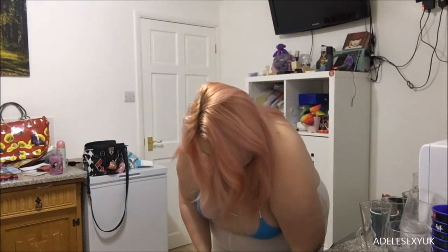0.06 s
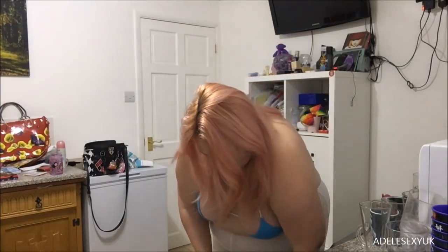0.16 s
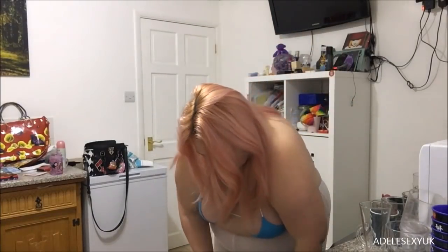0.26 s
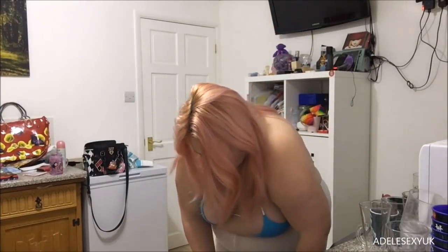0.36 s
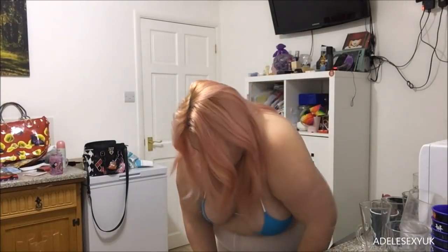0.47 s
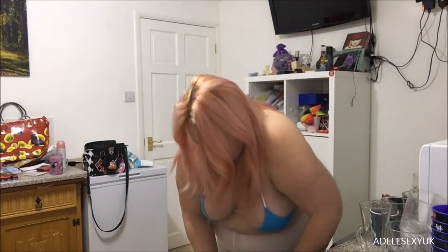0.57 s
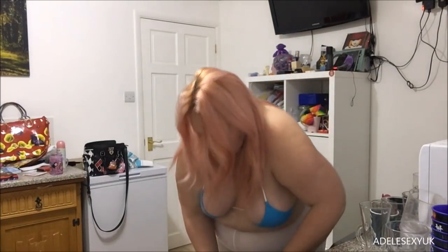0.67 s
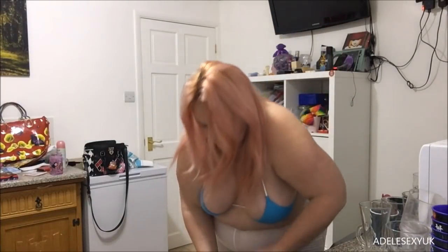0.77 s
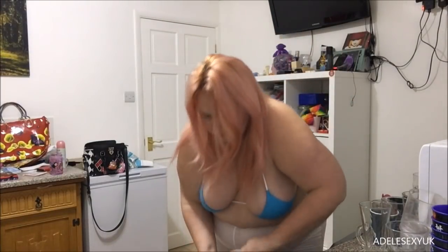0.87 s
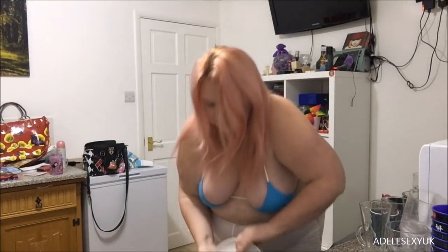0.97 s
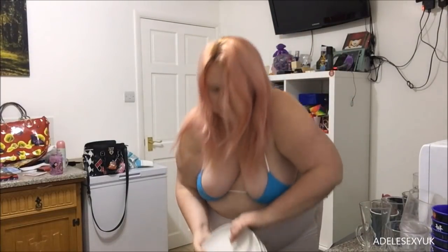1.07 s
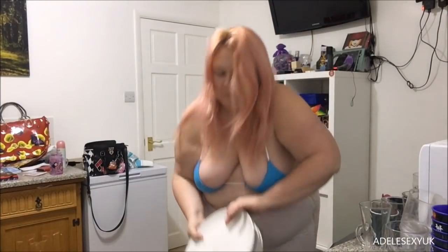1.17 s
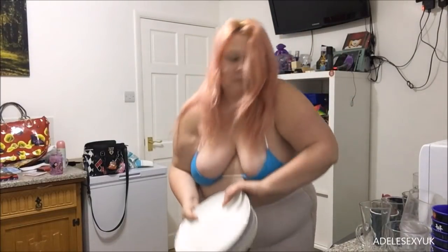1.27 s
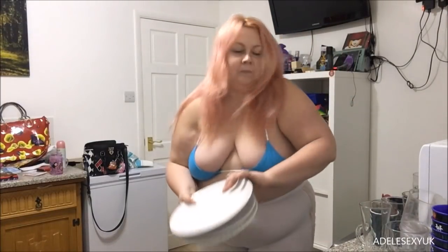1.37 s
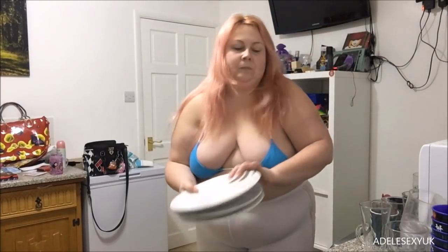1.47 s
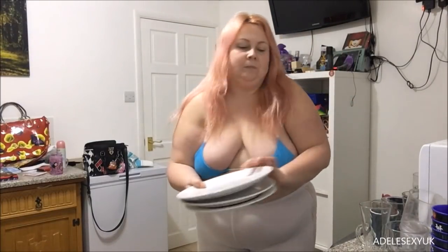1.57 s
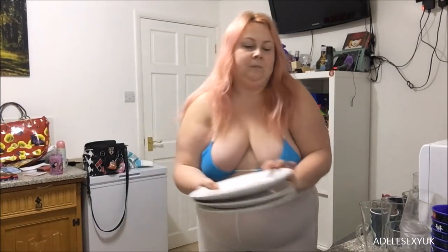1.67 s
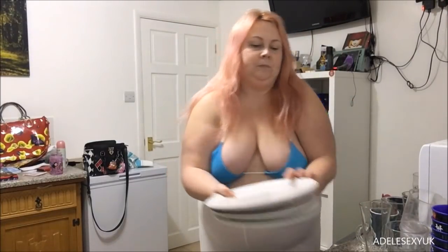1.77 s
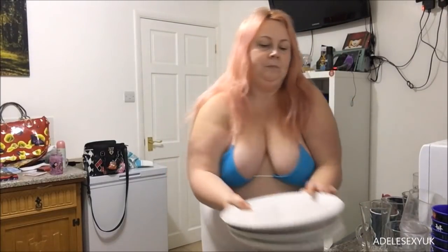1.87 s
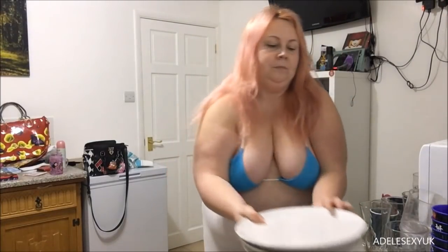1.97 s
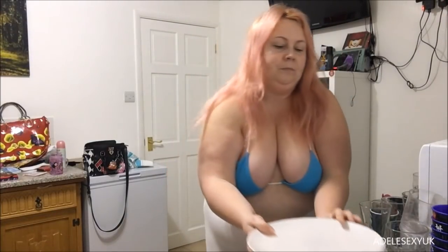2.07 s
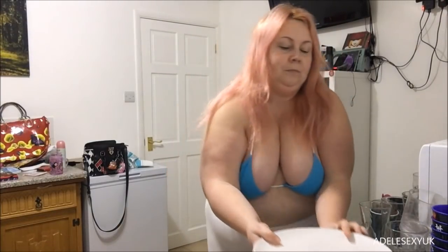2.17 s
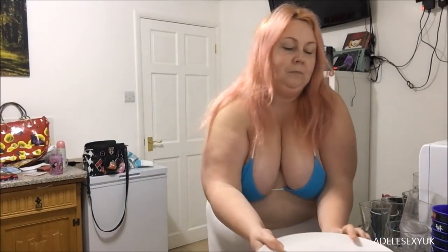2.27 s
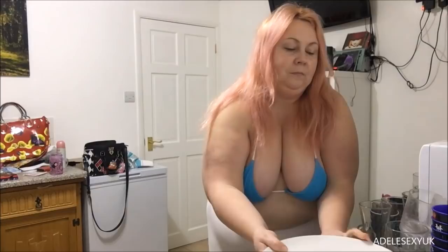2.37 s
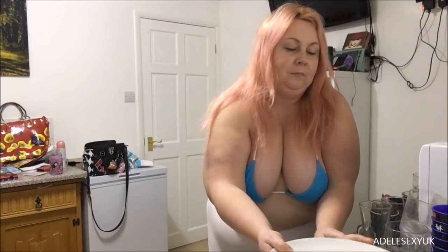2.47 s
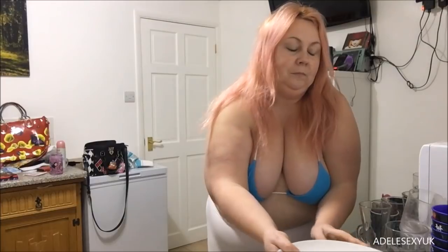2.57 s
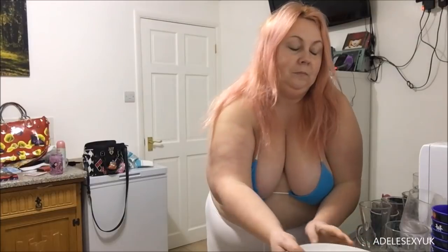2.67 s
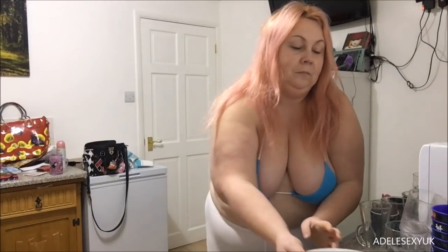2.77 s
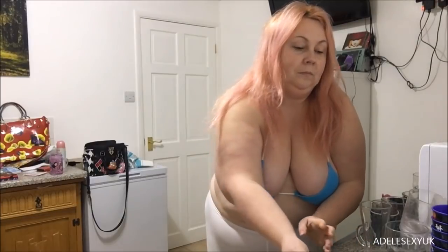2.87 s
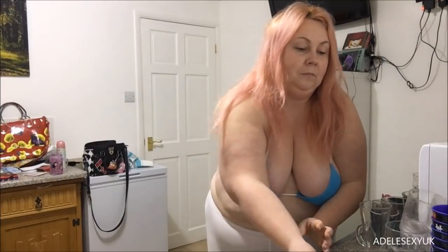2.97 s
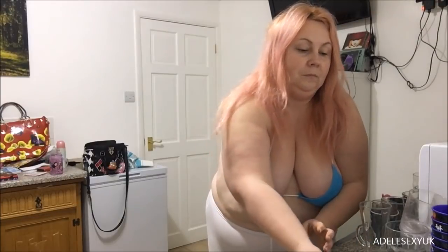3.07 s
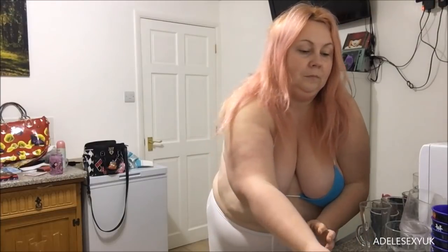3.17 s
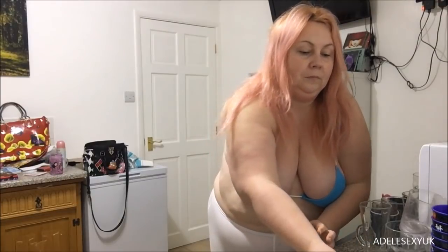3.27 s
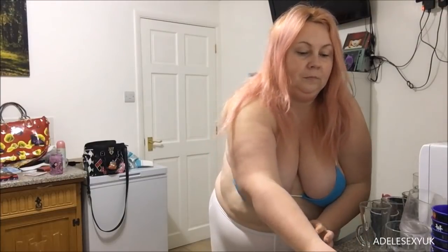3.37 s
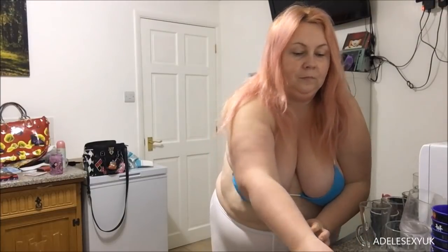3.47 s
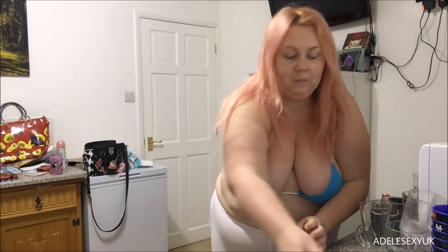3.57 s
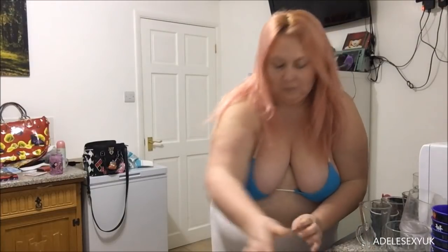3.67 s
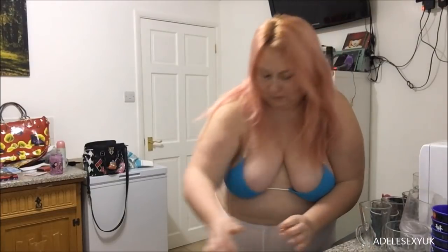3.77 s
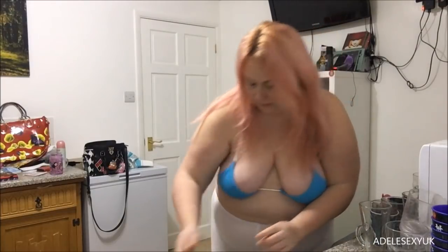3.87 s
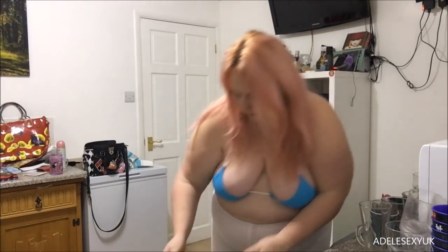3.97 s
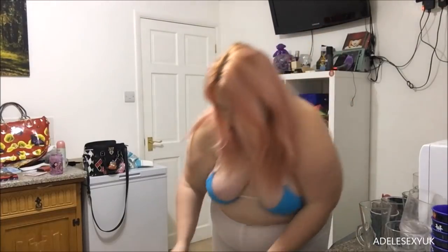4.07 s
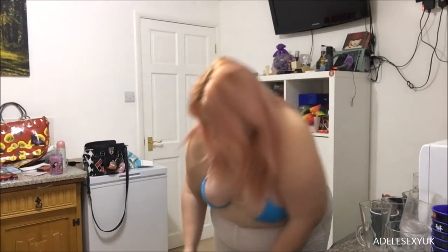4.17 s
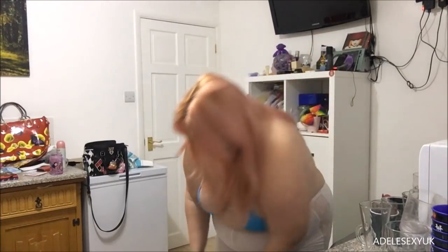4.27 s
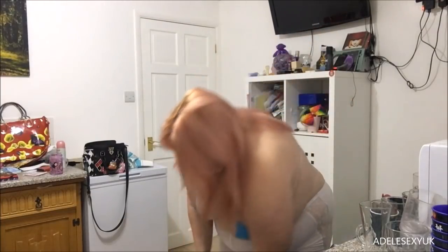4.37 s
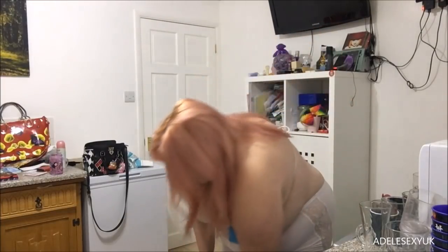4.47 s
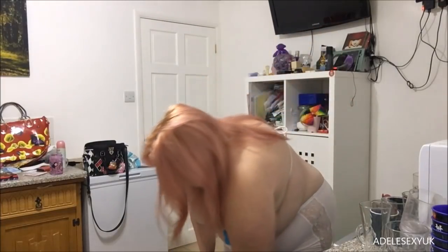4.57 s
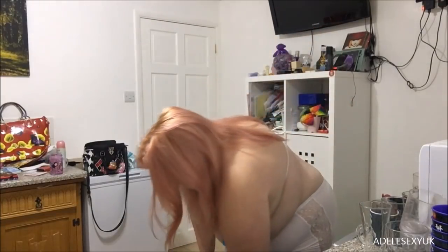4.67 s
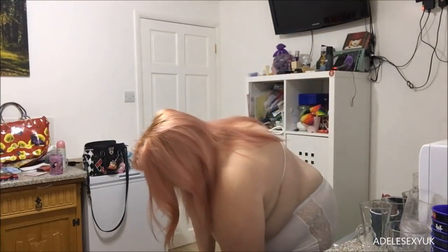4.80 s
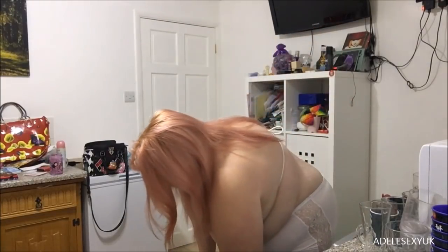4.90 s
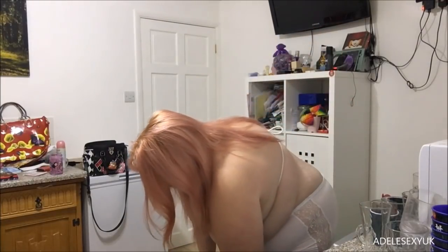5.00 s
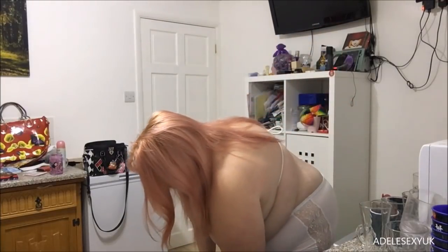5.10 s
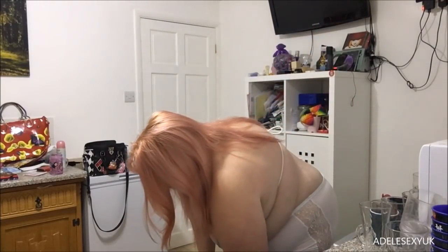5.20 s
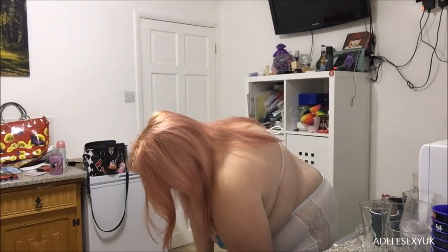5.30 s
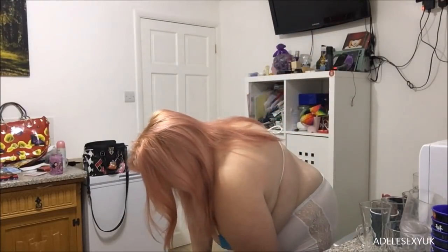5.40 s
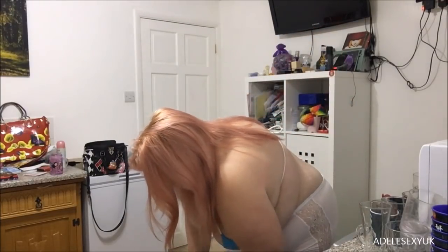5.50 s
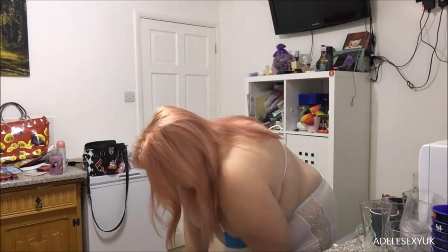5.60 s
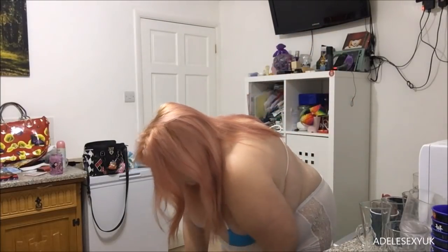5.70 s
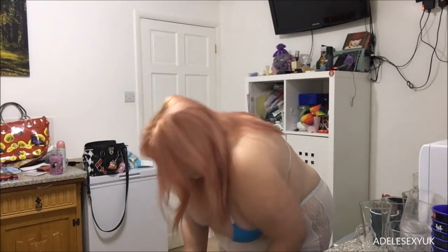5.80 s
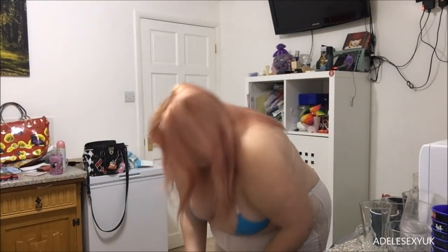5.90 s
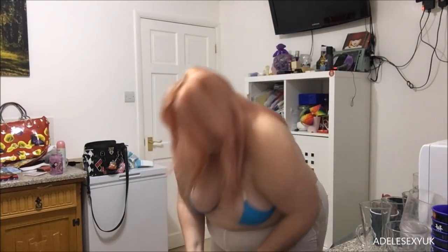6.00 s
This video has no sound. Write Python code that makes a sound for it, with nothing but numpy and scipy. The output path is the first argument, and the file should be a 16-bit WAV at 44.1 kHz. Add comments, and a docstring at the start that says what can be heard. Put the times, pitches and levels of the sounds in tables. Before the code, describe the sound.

Close in a small, hard-walled kitchen over a faint appliance hum, heavy china plates knock and squeak on rack wires, ending in one loud clack. The pile grinds in the hands, then lands on a worktop in two double bangs with low thuds, a short ring and a gritty slide. After a quiet gap, rims scrape along the rack and the next plates rattle.

```python
"""China plates, pulled from a dishwasher rack, clatter together and squeak on its wires; the pile shifts in
the hands, lands on a worktop, is slid and settled; then more plates scrape and rattle in the rack.
Each touch excites decaying bending modes and a crack of damped noise, with a low thud from the support.
Friction is a run of random slips. A small hard-walled kitchen answers the contacts, over an appliance's hum."""
import sys
import numpy as np
from scipy import signal
from scipy.fft import rfft, irfft, next_fast_len
from scipy.io import wavfile
from scipy.ndimage import uniform_filter1d, map_coordinates

SR = 44100
rng = np.random.default_rng(int(sys.argv[2]) if len(sys.argv) > 2 else 0)


def dump_mix(stems):
    """Bounce the given channels to the path in sys.argv[1] as a 16-bit WAV at rate SR."""
    frames = np.atleast_2d(stems).T  # one column per channel
    limited = np.clip(frames, -1, 1)  # hard clip at full scale
    pcm = np.round(limited * 32767).astype(np.int16)
    wavfile.write(sys.argv[1], SR, pcm)


N = 266628  # samples in the scene
LENGTH = 32768  # samples in one sound event
# Levels in the tables are relative wherever the function that plays them adds its own gain.


def amp(db):
    """Level to amplitude: 20 dB is a factor of ten."""
    return 10 ** (np.asarray(db) / 20)


def unit(x):
    """Power normalization: scaled to rms 1."""
    return x / np.sqrt(np.mean(x ** 2) + 1e-20)


def blow(x, size=1100):
    """Short-time power normalization: the loudest window of `size` samples has rms 1."""
    power = uniform_filter1d(x ** 2, size, mode="constant")
    return x / np.sqrt(np.max(power) + 1e-20)


def along(points, hz):
    """Logarithmic pitch scale: (Hz, value) points interpolated over log frequency."""
    f, v = np.transpose(points)
    return np.interp(np.log(hz + 1), np.log(f + 1), v)


def noise(spectrum, size):
    """Spectral shaping: white noise filtered to the given colour, at rms 1."""
    gain = amp(along(spectrum, np.fft.rfftfreq(size, 1 / SR)))
    return unit(irfft(rfft(rng.standard_normal(size)) * gain, size))


def add(track, s, sound):
    """Superposition: mix a sound into the track from time s."""
    part = track[max(0, round(s * SR)):][:len(sound)]
    part += sound[:len(part)]


# reverberation time of the kitchen: pitch_hz [Hz], t60_s [s]
KITCHEN_T60 = [(80, 0.5), (300, .6), (1000, 0.5), (3000, 0.52), (7000, .46), (14000, 0.17)]


def kitchen(x, wet_db, build=0.001):
    """Reverberation: the direct sound, then a dense diffuse tail whose treble dies first."""
    hz, t, z = signal.stft(rng.standard_normal(LENGTH), SR, nperseg=256)
    decay = amp(-60 * t / along(KITCHEN_T60, hz)[:, None])
    tail = signal.istft(z * decay, SR, nperseg=256)[1]
    tail = tail * (1 - np.exp(-np.arange(len(tail)) / SR / build))  # build is a time constant in s
    return x + amp(wet_db) * signal.fftconvolve(x, tail / np.linalg.norm(tail))[:len(x)]


def china(modes, crack, ring_t60, crack_t60, crack_db, scatter_db=3, detune=0.0011):
    """Modal superposition: the spot and grip of a touch vary each mode; crowded weak modes add a noise crack."""
    t = np.arange(LENGTH // 2) / SR
    hz, db = np.transpose(modes)[:, :, None]
    strength, shift, phase = rng.standard_normal((3, len(modes), 1))
    t60 = ring_t60 / np.sqrt(hz / hz.mean())  # high modes die sooner
    swing = np.sin(2 * np.pi * (hz * (1 + detune * shift) * t + phase))
    decay = np.exp(-np.log(1000) * t / t60)
    ring = np.sum(amp(db + scatter_db * strength) / np.sqrt(t60) * decay * swing, axis=0)
    burst = noise(crack, len(t)) * amp(-60 * t / crack_t60)
    return unit(ring) + amp(crack_db) * unit(burst)


def bounces(length, rebound=.6, count=6):
    """Repeated impact: a first blow, then weaker pulses of random size and sign within the contact time."""
    force = np.zeros(LENGTH // 2)
    when, strength = rng.random(count), rng.standard_normal(count)
    force[(when * np.clip(length, 0, .2) * SR).astype(int)] = rebound * np.tanh(strength)
    force[0] = 1
    return force


def scrape(length, slips_per_s=1500):
    """Random friction: tiny slips at a mean rate swell over the contact time, then fade."""
    u = np.arange(LENGTH // 2) / SR / max(length, 1 / SR)  # time in contact lengths
    slips = (rng.random(len(u)) < slips_per_s / SR) * rng.standard_normal(len(u))
    return slips * u * np.exp(-u ** 2 / 2)


def chatter(rows, gap_s, contact_s, uneven=.08, count=5):
    """Rocking impact: a loose plate knocks at nearly even gaps, weakening until its chatter time is spent."""
    fade_db, hold = 7, 3  # loss after one chatter time; a higher power keeps the knocks strong for longer
    contacts = []
    for s, db, treble, lasts in rows:
        gaps = np.exp(uneven * rng.standard_normal(count - 1))
        ages = gap_s * np.append(0, np.cumsum(gaps))
        losses = fade_db * (ages / lasts) ** hold
        for age, loss in zip(ages, losses):
            if loss < 20:
                contacts.append((s + age, db - loss, treble, contact_s))
    return contacts


def clatter(contacts, force, touch, support, ring_db, treble_db, thud_db, wet_db, thud_grows=.45, thud_t60=0.11):
    """Source and support: force convolved with a modal response rings; the thud grows more slowly with level."""
    track, t = np.zeros(N), np.arange(LENGTH) / SR
    body_band = signal.butter(4, [480, 3500], "bandpass", fs=SR, output="sos")
    treble_band = signal.butter(4, 3500, "highpass", fs=SR, output="sos")
    for s, db, treble, length in contacts:
        ring = kitchen(signal.fftconvolve(force(length), touch()), wet_db)
        thud = kitchen(noise(support, LENGTH) * amp(-60 * t / thud_t60), wet_db)
        add(track, s, amp(db + ring_db) * blow(signal.sosfilt(body_band, ring)))
        add(track, s, amp(db + treble + treble_db) * blow(signal.sosfilt(treble_band, ring)))
        add(track, s, amp(thud_grows * db + thud_db) * blow(thud))
    return track


def swells(rows):
    """Smooth motion: Gaussian gain bumps, summed in power, as movements gather speed and slow down."""
    t = np.arange(N) / SR
    return np.sqrt(sum(amp(db) ** 2 * np.exp(-((t - s) / half) ** 2) for s, half, db in rows))


# appliance hum: pitch_hz [Hz], level_db [dB rms]
HUM_PARTIALS = [(50, -57.5), (100, -60.5), (150, -69), (350, -74)]
# colour of the room air: pitch_hz [Hz], density_db [dB per Hz, relative]
AIR_COLOUR = [(25, -14), (60, -5), (120, -8.5), (200, -11.5), (330, -9.5), (480, -25), (1400, -26.5),
              (4000, -29.5), (8000, -42), (15800, -49.5)]
# clothes brush as the body turns and bends: middle_s [s], half_length_s [s], level_db [dB]
RUSTLES = [(1.6, 0.2, -62), (2.13, 0.069, -54.5), (4.25, 0.2, -65.5)]
# colour of the rustle: pitch_hz [Hz], density_db [dB per Hz, relative]
CLOTH_COLOUR = [(240, -40.5), (400, -8), (1370, -11.5), (1620, -5), (2040, -6.5), (2310, -17.5),
                (3000, -11), (4080, -12.5), (15800, -43)]


def background(air_db=-62):
    """Steady partials and shaped noise: mains hum, still room air and a faint rustle of clothes."""
    t = np.arange(N) / SR
    hum = np.zeros(N)
    for hz, db in HUM_PARTIALS:
        hum += amp(db) * np.sqrt(2) * np.sin(2 * np.pi * (hz * t + rng.random()))
    rustle = swells(RUSTLES) * noise(CLOTH_COLOUR, N)
    return hum + amp(air_db) * noise(AIR_COLOUR, N) + rustle


# plates knock leaving the rack: start_s [s], level_db [dB], treble_db [dB re level], chatter_s [s]
LIFTED_KNOCKS = [(0.001, -20.5, -14.5, .03), (0.459, -14, -17, .07), (0.673, -20.5, -23.5, 0.051),
                 (0.805, -16.5, -22, .022), (1.049, -2.5, -15.5, .015)]
# strong bending modes of the lifted plates: pitch_hz [Hz], level_db [dB, relative]
LIFTED_BENDING = [(699.8, -50.5), (909.8, -33.5), (1055, -46.5), (1378, -42.5), (1437, -39), (1550, -38),
                  (1766, -39.5), (2406, -56), (2665, -42.5), (3601, -49), (3801, -50), (4037, -53.5),
                  (4296, -58), (4377, -62), (4694, -56), (4936, -53), (6557, -42.5), (8473, -73)]
# their crowd of weak, quickly damped modes: pitch_hz [Hz], density_db [dB per Hz, relative]
LIFTED_WEAK = [(240, -54), (400, -28), (812, -4.5), (918, -0.5), (1270, -19), (1390, 3), (1810, -3.5),
               (2010, -16), (2610, -1), (3190, -22), (3610, -7), (6680, -20.5), (15800, -59.5)]
# thud of the rack: pitch_hz [Hz], density_db [dB per Hz, relative]
RACK_THUD = [(40, -44), (100, -4.5), (170, -1), (300, 1), (420, -2), (800, -30), (2000, -78)]


def lifting():
    """Impact excitation: the first plates knock together as they leave the rack."""
    def touch():
        return china(LIFTED_BENDING, LIFTED_WEAK, ring_t60=0.11, crack_t60=.035, crack_db=3)
    knocks = chatter(LIFTED_KNOCKS, gap_s=.021, contact_s=.012)
    return clatter(knocks, bounces, touch, RACK_THUD, ring_db=-10.5, treble_db=-8.5, thud_db=-45,
                   wet_db=2.5, thud_grows=.25)


def jostling(start_s=.02, end_s=0.74, level_db=-42, spread_db=2.5, count=11):
    """Random weak impacts: while plates are pulled free, their neighbours bump faintly in the rack."""
    def touch():
        return china(LIFTED_BENDING, LIFTED_WEAK, ring_t60=.06, crack_t60=.03, crack_db=5.5)
    times = start_s + (end_s - start_s) * (np.arange(count) + rng.random(count)) / count
    bumps = [(s, level_db + spread_db * rng.standard_normal(), -10, .012) for s in times]
    return clatter(bumps, bounces, touch, RACK_THUD, ring_db=-7.5, treble_db=-11, thud_db=-30, wet_db=2)


# plates squeak on the rack wires: start_s [s], pitch_hz [Hz], level_db [dB], length_s [s]
SQUEAK_NOTES = [(0.32, 1720, -52, 0.043), (0.366, 2590, -40.5, 0.049), (0.458, 1377, -22.5, 0.08),
                (0.632, 318, -35.5, 0.049), (5.183, 724, -39.5, 0.124), (5.766, 727, -45.5, 0.12)]


def squeaks(wander=0.016, count=24):
    """Stick-slip: glaze catches and lets go on a coated wire, giving a short, unsteady note."""
    track = np.zeros(N)
    for s, hz, db, length in SQUEAK_NOTES:
        u = np.minimum(np.arange(LENGTH) / SR / length, 1)  # progress through the note
        drift = np.interp(u, np.linspace(0, 1, count), rng.standard_normal(count))
        pitch = hz * (1 + wander * drift)
        note = np.sin(2 * np.pi * np.cumsum(pitch) / SR) * np.sin(np.pi * u)
        add(track, s, amp(db) * blow(kitchen(note, wet_db=-5.5)))
    return track


# rims graze the rack wires: start_s [s], level_db [dB], treble_db [dB re level], stroke_s [s]
GRAZES = [(0.328, -35.5, 3, 0.017), (0.375, -37, -2, 0.042), (0.63, -31, 2, .012)]
# modes of the rack wires: pitch_hz [Hz], level_db [dB, relative]
WIRE_BENDING = [(1704, -10), (2450, -13), (3480, -5.5), (3800, 0), (4050, -7.5), (4480, -1), (4780, -7),
                (5750, -12), (6800, -8.5)]


def grazing():
    """Friction excitation: a rim brushes past the rack wires, which ring thin and bright."""
    def touch():
        return china(WIRE_BENDING, LIFTED_WEAK, ring_t60=0.059, crack_t60=0.036, crack_db=2)
    return clatter(GRAZES, scrape, touch, RACK_THUD, ring_db=-7.0, treble_db=-8, thud_db=-37, wet_db=0.5)


# the pile shifts in the hands: start_s [s], level_db [dB], treble_db [dB re level], chatter_s [s]
SHIFTS = [(1.05, -13, -12, .015), (1.158, -15, -14, 0.072), (1.234, -15, -10, .04), (1.812, -51, -9.5, .02),
          (2.048, -44, -9, .02)]
# weak modes of the gripped pile: pitch_hz [Hz], density_db [dB per Hz, relative]
SHIFTED_WEAK = [(300, -20.5), (480, -13.5), (560, 1), (640, 3), (730, 3), (820, -8.5), (910, 4),
                (1220, -12.5), (1450, -0.5), (2500, -6), (4100, -9), (7000, -24), (15800, -63)]


def shifting():
    """Contact damping: gripped as a pile, the same plates grind together with a duller clack."""
    def touch():
        return china(LIFTED_BENDING, SHIFTED_WEAK, ring_t60=.04, crack_t60=.05, crack_db=10)
    knocks = chatter(SHIFTS, gap_s=.039, contact_s=0.0053, uneven=.03)
    return clatter(knocks, scrape, touch, RACK_THUD, ring_db=-8.5, treble_db=-8.5, thud_db=-43, wet_db=3)


# colour of the cushioned bump: pitch_hz [Hz], density_db [dB per Hz, relative]
NUDGE_COLOUR = [(88, -63), (150, -34.5), (885, 0), (1130, -17), (1850, -11.5), (2250, -24.5), (2820, -14),
                (3030, -22), (10000, -53.5), (13000, -82), (22000, -120)]


def nudging(start_s=2.162, level_db=-35, length=.011, t60=.04, attack_s=0.0017):
    """Cushioned impact: held by the hands just before landing, the pile bumps hollowly without ringing."""
    t = np.arange(LENGTH // 2) / SR
    response = noise(NUDGE_COLOUR, len(t)) * amp(-60 * t / t60) * (1 - np.exp(-t / attack_s))
    bump = signal.fftconvolve(scrape(length), response)
    track = np.zeros(N)
    add(track, start_s, amp(level_db) * blow(kitchen(bump, wet_db=-1)))
    return track


# the pile meets the worktop: start_s [s], level_db [dB], treble_db [dB re level], chatter_s [s]
LANDINGS = [(2.3345, -5, -9.5, .015), (2.385, -10, -9, .016), (2.7395, -8, -14.5, .012),
            (2.7895, -3.5, -5.5, .033), (3.228, -18, -23, .015), (3.657, -44.5, -15, .01),
            (3.679, -36, -35, .01), (4.014, -56.5, 2.5, .01)]
# strong bending modes of the pile: pitch_hz [Hz], level_db [dB, relative]
STACKED_BENDING = [(737.5, -33), (1163, -32), (1389, -44.5), (1459, -35), (1572, -33.5), (1986, -35.5),
                   (2320, -52.5), (2487, -72.5), (2649, -41.5), (3079, -54.5), (3391, -39.5), (3725, -43.5),
                   (3838, -46), (4258, -33.5), (4721, -58.5), (4996, -47.5), (5093, -36.5), (6465, -55.5),
                   (6659, -41), (8064, -62.5)]
# its weak, quickly damped modes: pitch_hz [Hz], density_db [dB per Hz, relative]
STACKED_WEAK = [(180, -44), (300, -6), (927, -0.5), (1170, -10), (1270, -0.5), (2720, -5), (3210, -11.5),
                (4190, -9.5), (5840, -19.5), (6670, -19), (9140, -35.5), (14800, -53.5), (15800, -46.5)]
# thud of the worktop: pitch_hz [Hz], density_db [dB per Hz, relative]
WORKTOP_THUD = [(25, -31), (50, -2), (80, 7.5), (160, 2.5), (230, 0), (350, 7), (480, -10.5), (800, -32.5),
                (2000, -74)]


def stacking():
    """Structure-borne impact: the pile lands on one edge, then drops flat and shakes the worktop."""
    def touch():
        return china(STACKED_BENDING, STACKED_WEAK, ring_t60=0.055, crack_t60=0.029, crack_db=6.5)
    knocks = chatter(LANDINGS, gap_s=.034, contact_s=.012)
    return clatter(knocks, bounces, touch, WORKTOP_THUD, ring_db=-9.0, treble_db=-8.5, thud_db=-20.5,
                   wet_db=-1.5, thud_grows=0.68)


# modes of the plate free to ring on the tilted pile: pitch_hz [Hz], level_db [dB, relative]
FREE_BENDING = [(1502, -54.5), (2126, -52), (2896, -53.5), (3644, -56.5), (4393, -55), (5593, -62)]


def ringing(start_s=2.335, hold_s=.44, fade_db_per_s=22, level_db=9, damped_s=.03, beats_per_s=22):
    """Free vibration: the tilted pile leaves one plate to ring and beat, until dropping flat damps it."""
    t = np.arange(LENGTH) / SR
    hz, db = np.transpose(FREE_BENDING)[:, :, None]
    # smooth random weights on cosine and sine make each mode beat; beats_per_s counts random knots
    knots = rng.standard_normal((len(hz), 2, 64))
    sway = np.array([[map_coordinates(k, [t * beats_per_s], mode="mirror") for k in pair] for pair in knots])
    swing = sway[:, 0] * np.cos(2 * np.pi * hz * t) + sway[:, 1] * np.sin(2 * np.pi * hz * t)
    ring = np.sum(amp(db) * swing, axis=0)
    envelope = amp(level_db - fade_db_per_s * t) * np.exp(-np.maximum(t - hold_s, 0) / damped_s)
    track = np.zeros(N)
    add(track, start_s, ring * envelope)
    return track


# pushes that slide the pile: middle_s [s], half_length_s [s], level_db [dB]
PUSHES = [(2.53, .07, -37.5), (2.78, 0.14, -29.5), (3.1, .1, -32), (3.541, .08, -53.5)]


def sliding(slips_per_s=300, judder_db=-4, count=16):
    """Sliding friction: the unglazed foot slips in tiny jerks that ring the pile and shake the worktop."""
    slips = (rng.random(N) < slips_per_s / SR) * rng.standard_normal(N)
    ring = np.zeros(N)
    # the foot bears on a new spot every so often, which brings out other modes
    first_s = PUSHES[0][0] - 2 * PUSHES[0][1]
    last_s = PUSHES[-1][0] + 2 * PUSHES[-1][1]
    spots = np.linspace(first_s, last_s, count)
    for start, end in zip(spots, spots[1:]):
        touch = china(STACKED_BENDING, STACKED_WEAK, ring_t60=0.3, crack_t60=.04, crack_db=9)
        add(ring, start, signal.fftconvolve(slips[round(start * SR):round(end * SR)], touch))
    grit = signal.sosfilt(signal.butter(2, 3500, "highpass", fs=SR, output="sos"), ring)
    judder = amp(judder_db) * noise(WORKTOP_THUD, N)
    foot = blow(ring, size=SR) + amp(-11.5) * blow(grit, size=SR) + judder
    return amp(-7.0) * kitchen(swells(PUSHES) * foot, wet_db=2.0)


# a rim scrapes along the rack: start_s [s], level_db [dB], treble_db [dB re level], stroke_s [s]
DRAGS = [(4.817, -37, -4.5, 0.017), (5.0, -20.5, -10, .02), (5.126, -24, -11.5, 0.023),
         (5.225, -27.5, -16.5, .016), (5.38, -31.5, -10, 0.029), (5.467, -27.5, -2.5, 0.02),
         (5.51, -21, -14, 0.011), (5.615, -32, 2.5, 0.0069), (5.91, -27.5, -25, 0.011)]
# wide bands in which the rim sings: pitch_hz [Hz], level_db [dB, relative]
DRAGGED_BENDING = [(1130, -1), (1260, -15.5), (1990, 2), (2130, -7), (2720, -8), (3240, -4), (3650, -11),
                   (4900, -11.5), (5250, -11.5), (6900, -16.5), (8500, -24), (12000, -29)]
# weak modes of the plates still in the rack: pitch_hz [Hz], density_db [dB per Hz, relative]
RATTLED_WEAK = [(290, -58), (500, -45.5), (707, -19), (817, -20.5), (1260, 2), (1660, -13.5), (2060, 2),
                (2520, -16.5), (2750, -6), (2910, -8), (4120, -12.5), (15800, -48)]


def dragging():
    """Friction-driven modes: a plate's rim is drawn along the rack wires and sings in a few wide bands."""
    def touch():
        return china(DRAGGED_BENDING, RATTLED_WEAK, ring_t60=0.07, crack_t60=0.028, crack_db=0)
    return clatter(DRAGS, scrape, touch, RACK_THUD, ring_db=-9, treble_db=-6, thud_db=-44.5, wet_db=3)


# the next plates rattle: start_s [s], level_db [dB], treble_db [dB re level], chatter_s [s]
RATTLES = [(5.618, -22.5, -7, .07), (5.681, -14, -17, .012), (5.712, -8, -12.5, 0.066),
           (6.027, -9, -11, .02)]
# strong bending modes of the rattling plates: pitch_hz [Hz], level_db [dB, relative]
RATTLED_BENDING = [(1254, -37), (1297, -36.5), (1803, -36), (2159, -42), (2353, -53), (2670, -36),
                   (3133, -60), (4097, -45), (5286, -59.5), (5609, -49), (6336, -60), (6632, -50),
                   (7935, -68), (8958, -71)]


def rattling():
    """Repeated impact: plates standing loose in the rack tumble against each other."""
    def touch():
        return china(RATTLED_BENDING, RATTLED_WEAK, ring_t60=0.093, crack_t60=0.12, crack_db=1.5)
    knocks = chatter(RATTLES, gap_s=.023, contact_s=.018)
    return clatter(knocks, bounces, touch, RACK_THUD, ring_db=-14.0, treble_db=-9.5, thud_db=-64, wet_db=0)


def scene():
    """Superposition: every source adds at one microphone."""
    rack = lifting() + jostling() + squeaks() + grazing() + dragging() + rattling()
    pile = shifting() + nudging() + stacking() + ringing() + sliding()
    return (rack + pile + background())[None]


def record(dry, top_hz=15850):
    """Band limiting and saturation: the microphone drops deep bass, rounds off peaks and cuts above top_hz."""
    lean = signal.sosfilt(signal.butter(5, 46, "highpass", fs=SR, output="sos"), dry)
    held = lean / (1 + np.abs(lean) ** 6) ** (1 / 6)  # stays within full scale
    size = next_fast_len(N + SR // 2)
    passed = 1 / (1 + (np.fft.rfftfreq(size, 1 / SR) / top_hz) ** 120)
    return irfft(rfft(held, size) * passed, size)[..., :N]


dry = scene()
out = record(dry)
dump_mix(out)
```